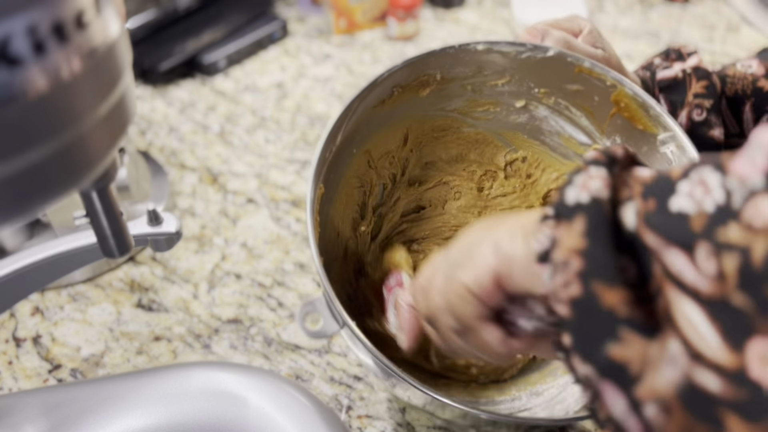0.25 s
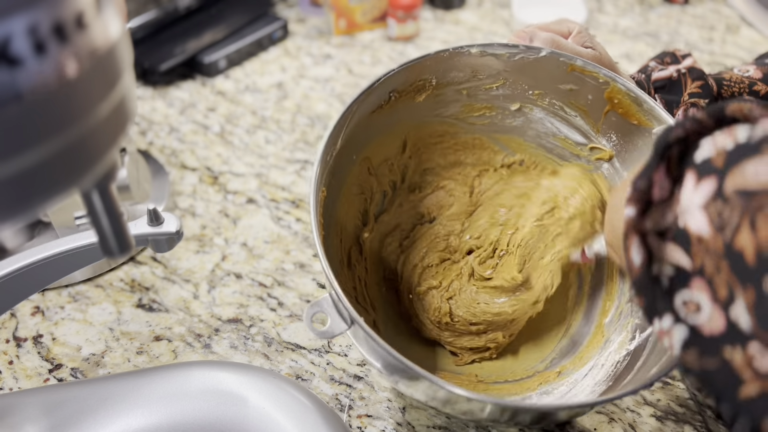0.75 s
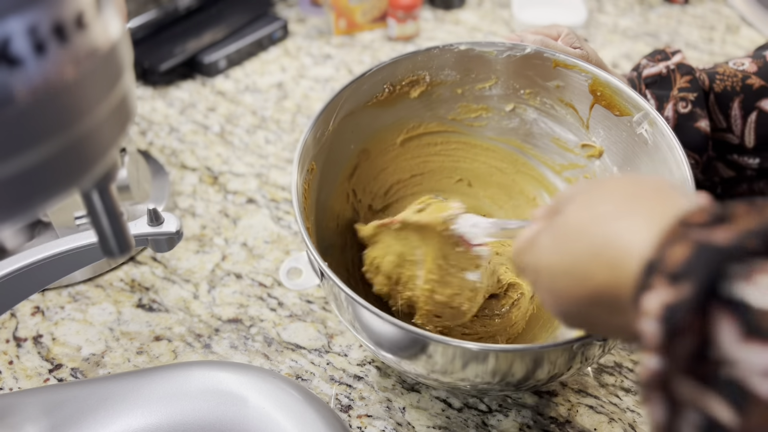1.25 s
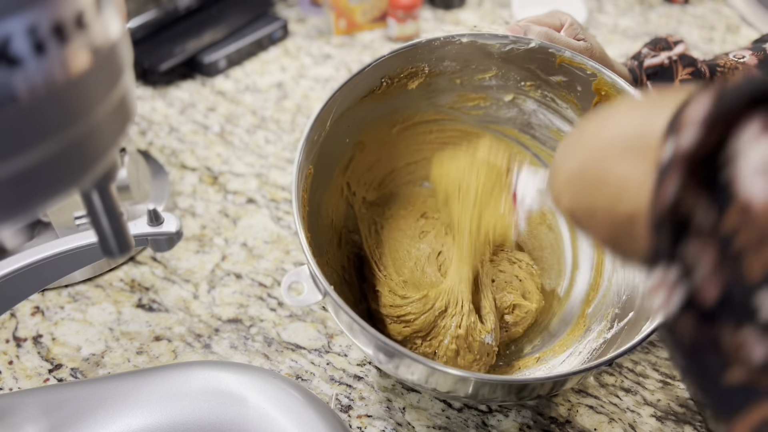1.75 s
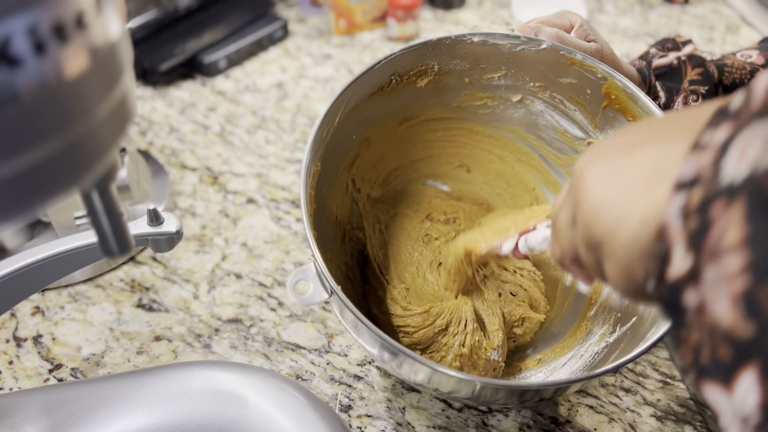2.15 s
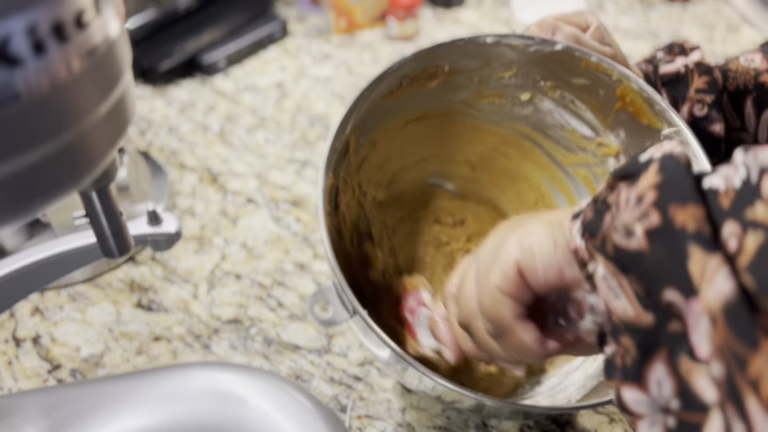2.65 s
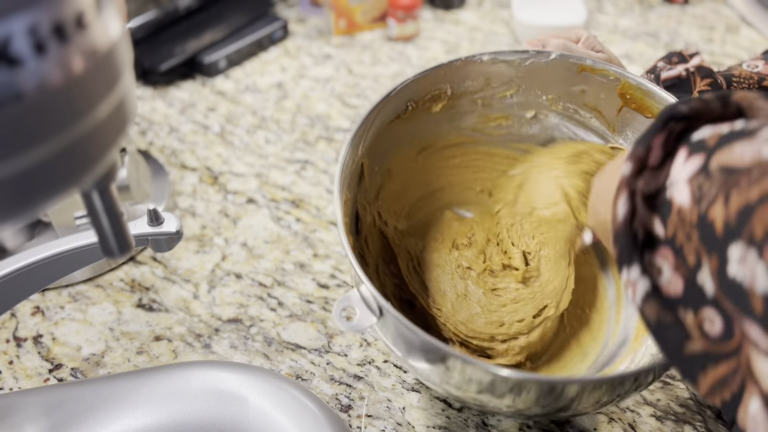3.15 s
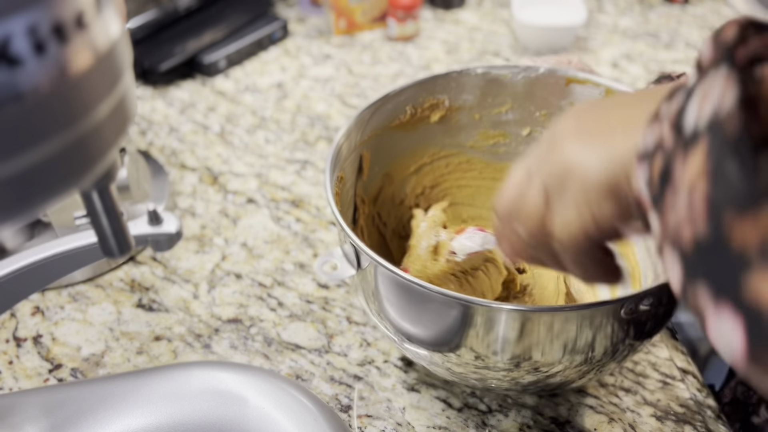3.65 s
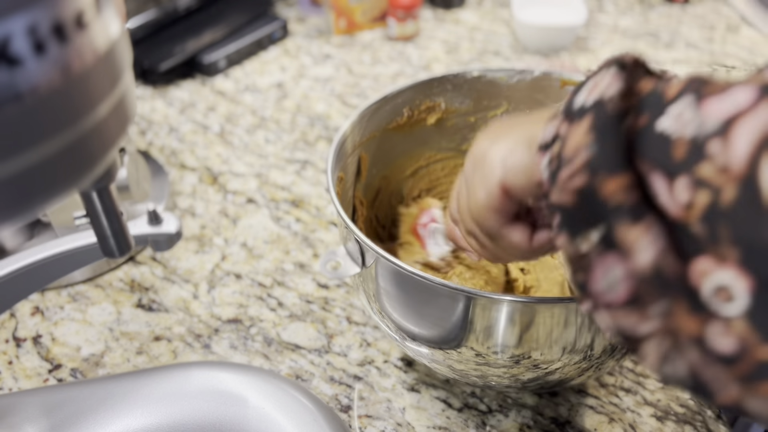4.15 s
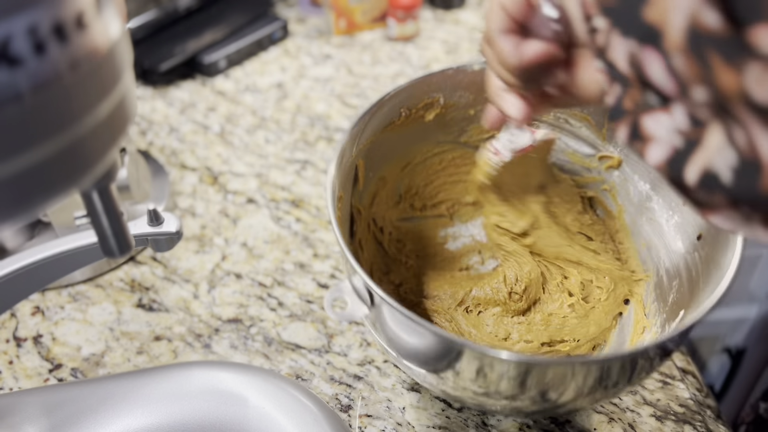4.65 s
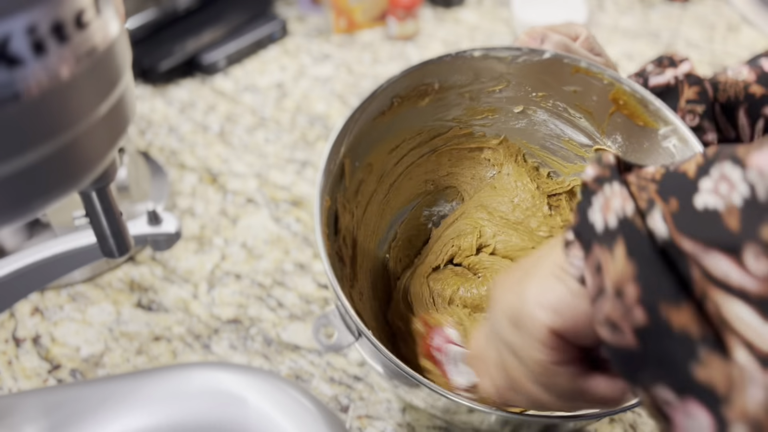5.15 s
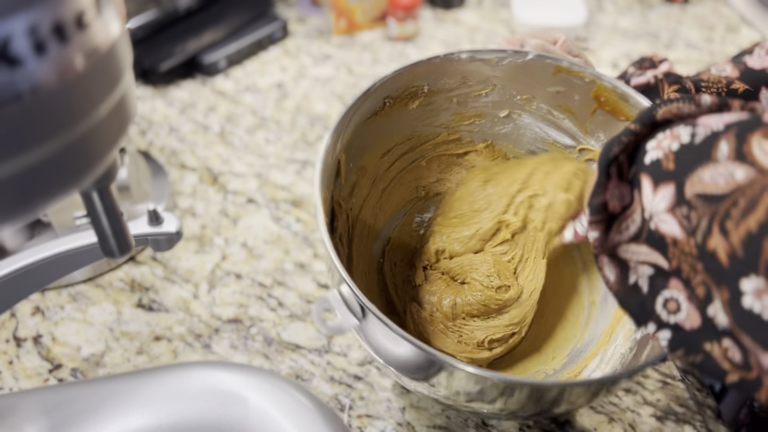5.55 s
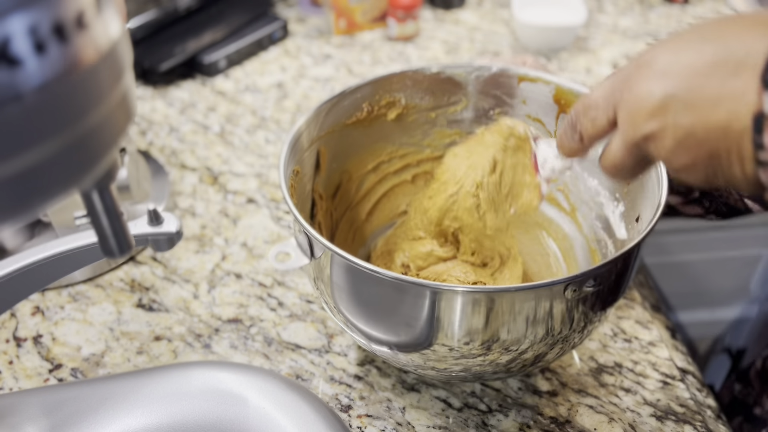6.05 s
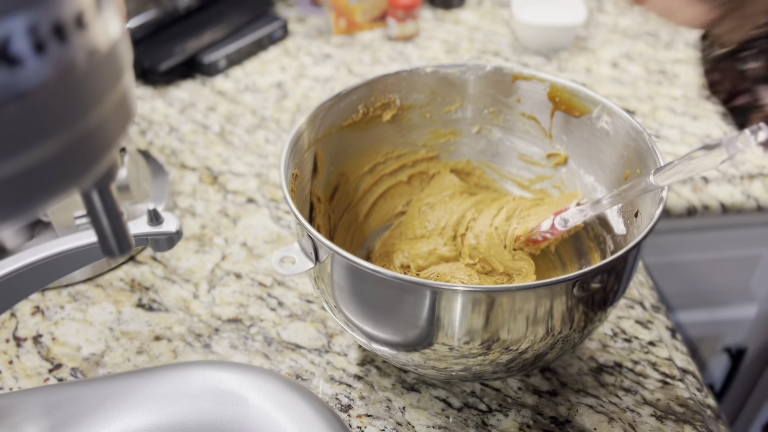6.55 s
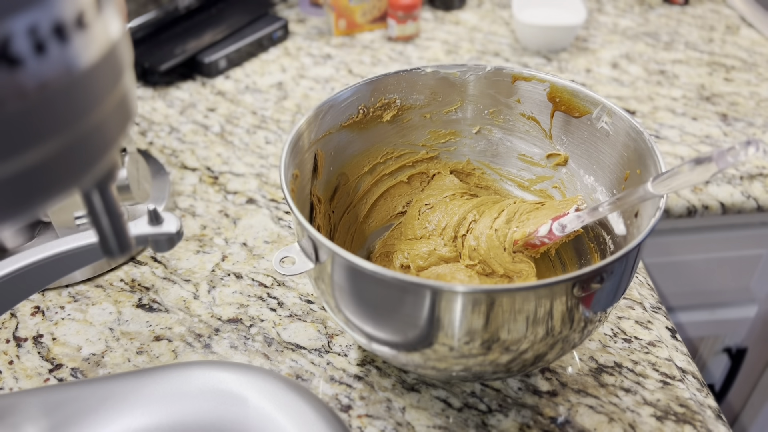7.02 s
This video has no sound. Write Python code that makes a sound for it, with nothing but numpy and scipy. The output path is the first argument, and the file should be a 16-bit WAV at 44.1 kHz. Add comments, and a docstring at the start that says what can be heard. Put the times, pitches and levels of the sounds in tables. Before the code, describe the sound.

A spatula rubs and smacks thick dough in a steel bowl, with dull thuds and a bright rim clink over a low kitchen hum.

```python
"""A spatula stirs thick dough in a steel bowl on a stone counter, close to a phone, over a rumbling, humming kitchen.
First the blade rubs the wall (filtered noise) in one long stroke, ending in a smack (a noise burst) at 1 s.
Short light strokes follow; near 3 s the blade judders, and at 3.3 s the handle clinks on the rim (fading tones).
After a quieter spell it rubs harder at 5.4 s; low thuds (fading tones) lead to the loudest clink at 6.2 s.
Near 6.8 s the phone is bumped, amid strong last strokes with the fizz of tearing dough (treble noise)."""
import sys
import numpy as np
from scipy import signal
from scipy.fft import rfft, irfft
from scipy.io import wavfile
from scipy.ndimage import uniform_filter1d

SR = 44100
rng = np.random.default_rng(int(sys.argv[2]) if len(sys.argv) > 2 else 0)


def file_out(sig):
    """Save sig as 16-bit WAV at sys.argv[1]."""
    # one column per channel
    cols = np.atleast_2d(sig).T
    # limit, then scale
    lim = np.clip(cols, -1, 1)
    pcm = np.round(lim * 32767).astype(np.int16)
    wavfile.write(sys.argv[1], SR, pcm)


N = 321048
T = np.arange(N) / SR

# tones of the steel bowl, held and damped by dough: (frequency [Hz], level [dB], time to fade by 60 dB [s])
BOWL_MODES = [(860, -20, 0.056), (994, -12, .06), (1063.7, 9.5, 0.08), (1080, -12, 0.037), (1170, -11, .07),
              (1296, -5, 0.092), (1482, -20, 0.066), (1606, -21, 0.2), (1720, -17, 0.21), (1970, -10, .11),
              (1966, -18, 0.14), (2120, -6, 0.051), (2085, -5, 0.061), (2215, -12.5, 0.08),
              (4585, -23.5, .06), (4800, -25.5, .05), (5070, -24, .045), (5800, -24.5, 0.07),
              (6680, -27, 0.066)]


def undb(db):
    """Turn decibels into a plain amplitude factor."""
    return 10 ** (np.asarray(db) / 20)


def unit(x):
    """Scale to an average (RMS) strength of 1."""
    return x / np.sqrt(np.mean(x ** 2))


def band(x, hz, width_hz):
    """Keep the sound around one pitch: a resonance of gain 1 at its centre, applied twice."""
    b, a = signal.iirpeak(min(hz, .45 * SR), hz / (1.36 * width_hz), fs=SR)
    once = signal.lfilter(b, a, x)
    return signal.lfilter(b, a, once)


def walk(rate):
    """Wander smoothly between random values, a new one every 1 / rate seconds; spread about 1.4."""
    k = int(SR / rate)
    steps = np.repeat(rng.standard_normal(N // k + 1), k)
    return 1.684 * uniform_filter1d(steps, k)[:N]


def fade(t60, s):
    """Die away as a struck body does, by 60 dB in t60 seconds; the curve is s seconds long."""
    return np.exp(-np.log(1000) * np.arange(int(s * SR)) / SR / max(t60, .003))


def ring(modes, contact_s):
    """Sound fading tones that build up over the contact, at random phases in each of the two paths."""
    t = T[:int(.4 * SR)]
    phase = 0.93 * rng.standard_normal((len(modes), 2, 1))
    out = 0
    for (hz, db, t60), p in zip(modes, phase):
        out = out + undb(db) * np.sin(2 * np.pi * hz * t + p) * fade(t60, .4)
    return out * (1 - np.exp(-t / max(contact_s, 1e-4)))


def add(out, x, s, db):
    """Mix in a sound that starts at s seconds, scaled so that its peak is at db."""
    i = int(s * SR)
    scaled = x * undb(db) / np.abs(x).max()
    out[:, i:i + x.shape[1]] += scaled[:, :N - i]


def kitchen():
    """Air noise with a swelling bass, noise through room resonances, and the wavering hum of a distant motor."""
    # colour of the kitchen air and the phone's own hiss: (frequency [Hz], relative level [dB per Hz])
    air_colour = [(22, -32.5), (59, 6), (80, -2), (114, -4.5), (190, -7), (235, -13), (416, -16),
                  (600, -18), (760, -22.5), (1400, -26.5), (2400, -53.5), (7000, -52), (9900, -95),
                  (12000, -44), (16000, -59.5)]
    # resonances of the room: (frequency [Hz], width [Hz], level [dB])
    room_modes = [(268.7, 19, -68), (318, 25, -71), (417, 27, -68), (586, 28, -69)]
    air_db = -51.5  # before the bass swells
    hum_hz, hum_db, waver_hz = 162.2, -58, 1.44  # the waver scales walk()

    hz, db = np.transpose(air_colour)
    f = np.fft.rfftfreq(N, 1 / SR) + 1
    colour = undb(np.interp(np.log(f), np.log(hz), db))
    colour = colour * np.minimum(f / hz[0], 1) ** 3  # falls away in the deepest bass
    air = unit(irfft(rfft(rng.standard_normal((2, N))) * colour, N)) * undb(air_db)
    bass_change = undb(1.2 * walk(4)) - 1
    air = air + bass_change * band(air, 70, 60)

    room = sum(undb(g) * unit(band(rng.standard_normal((2, N)), c, w)) for c, w, g in room_modes)

    hum = np.sin(2 * np.pi * np.cumsum(hum_hz + waver_hz * walk(6.5)) / SR)
    hum_level = np.sqrt(2) * undb(hum_db + .8 * walk(8))
    return air + room + hum * hum_level


def thuds():
    """Bowl foot and elbow hit the counter, and near 6.8 s the phone is bumped: dull tones, knock, rattle and boom."""
    # blows: (time [s], peak level [dB], pitch [Hz], knock against it [dB], boom against it [dB],
    # time for the dull tones to fade by 60 dB [s])
    blows = [(1.009, -41.5, 118, -10, -7, 0.091), (1.61, -29.5, 205, -6, -7.5, 0.052),
             (3.076, -41, 89, -11, -23, 0.13), (3.256, -26, 221, 1.5, -17.5, 0.032),
             (4.388, -30, 188, -7, -27, 0.26), (4.407, -33, 201.6, 0, -12, 0.18),
             (4.464, -38, 185, -2, -11.5, 0.13), (6.011, -30, 310, 6, -21, 0.1),
             (6.025, -20, 194.5, -8.5, -17, 0.058), (6.041, -35.5, 152, 0, -7, 0.14),
             (6.206, -26.5, 208, -0.5, -10, 0.086), (6.533, -43.5, 164, 4.5, -6, 0.098),
             (6.813, -21.5, 155.5, -25, -18, 0.07), (6.829, -27.5, 171, -15, -21, 0.056),
             (6.871, -29.5, 130, -20, -9.5, 0.047)]
    # tones of the knock, from the bowl's foot: (frequency [Hz], level [dB], time to fade by 60 dB [s])
    knock_modes = [(524, 4.5, 0.02), (591, 0, 0.024), (1038, -13.5, 0.047)]
    boom_hz, boom_t60_s = 63.8, 0.12  # the cabinet under the counter

    out = np.zeros((2, N))
    for s, db, hz, knock_db, boom_db, t60 in blows:
        dull = [(hz, 0, t60), (0.583 * hz, -8, t60), (1.47 * hz, -14, t60)]
        add(out, ring(dull, 0.0033), s, db)
        add(out, ring(knock_modes, 0.0027), s, db + knock_db)
        rattle = rng.standard_normal((2, int(.2 * SR))) * fade(0.12, .2)
        add(out, band(rattle, 593, 590), s, db + knock_db - 11)
        add(out, ring([(boom_hz, 0, boom_t60_s)], 0.024), s + 0.015, db + boom_db)
    return out


def clinks():
    """The handle hits the rim: a harder blow feeds the higher bowl tones, and the handle adds a short clack."""
    # blows: (time [s], peak level [dB], hardness [dB per octave], contact [s],
    # dead clack against the ring [dB], shimmer against the ring [dB], shimmer centre [Hz])
    blows = [(3.255, -21.5, -10, 0.00034, 9, -4, 7500), (6.205, -10.5, 8, 0.0034, -3.5, -2, 4910),
             (6.218, -17.5, -9, 0.0099, -26, -14, 4440), (6.533, -56, 1, 0.0013, 11, -2, 5300)]
    # tones of the plastic handle: (frequency [Hz], level [dB], time to fade by 60 dB [s])
    handle_modes = [(1116.3, 3.5, 0.015), (1453, -5.5, 0.018), (2190, -8, 0.011), (2540, -15, 0.012),
                    (4700, -16, 0.014)]
    # the crowd of high bowl tones, too dense to tell apart, is made as noise
    shimmer_width_hz, shimmer_t60_s = 2730, 0.075
    # the handle comes to rest on the rim and damps the ring
    settle_s, settle_t60_s = .045, .12

    out = np.zeros((2, N))
    damping = np.append(np.ones(int(settle_s * SR)), fade(settle_t60_s, .4))[:int(.4 * SR)]
    for s, db, tilt_db, contact, clack_db, shimmer_db, shimmer_hz in blows:
        modes = [(hz, g + tilt_db * np.log2(hz / 1061), t60) for hz, g, t60 in BOWL_MODES]
        add(out, ring(modes, contact) * damping, s, db)
        add(out, ring(handle_modes, 0.00057), s, db + clack_db)
        crowd = rng.standard_normal((2, int(.4 * SR))) * fade(shimmer_t60_s, .4)
        add(out, band(crowd, shimmer_hz, shimmer_width_hz), s, db + shimmer_db)
    return out


def judders(out):
    """The blade sticks and slips: a train of tiny noise bursts, a little uneven in time and strength."""
    # stretches: (start [s], end [s], slips per second [Hz], centre [Hz], typical peak level [dB],
    # treble against it [dB])
    stretches = [(2.74, 2.77, 84, 3400, -42.5, -13), (3.035, 3.091, 106, 3160, -44.5, 1),
                 (4.11, 4.285, 100, 4800, -54.5, -13)]
    for start, end, rate, hz, db, top_db in stretches:
        for s in np.arange(start, end, 1 / rate):
            slip = rng.standard_normal((2, 900)) * fade(0.011, 900.5 / SR)
            late, size = rng.standard_normal(2)
            add(out, band(slip, hz, 0.37 * hz), s + 0.0013 * late, db + 3.3 * size)
            add(out, band(slip, 12440, 1800), s + .001 * late, db + top_db + 2.5 * size)


def ticks(rasp_db):
    """Dough smacks: short noise bursts through two resonances and a quicker top; then the judders."""
    # smacks and ticks: (time [s], peak level of the low part [dB], low centre [Hz], high centre [Hz],
    # high part against low [dB], top against low [dB])
    smacks = [(0.319, -55.5, 2780, 4900, 10, -10), (1.0091, -33, 3960, 8260, 8.5, 1.5),
              (1.6, -45, 2420, 4750, 1, -4), (2.3553, -42, 3200, 5050, 9.5, 8.5),
              (2.587, -48, 2260, 6500, 3.5, -15), (2.799, -43, 3580, 4700, -16, 1.5),
              (2.83, -45.5, 3580, 5670, -3, 2), (2.854, -45.5, 3570, 6990, 0, 6),
              (2.88, -51, 2170, 5080, -8, 4), (3.2555, -27.5, 2500, 4770, 4.5, 3),
              (3.3706, -57.5, 2020, 5150, 14.5, 11.5), (3.4224, -60.5, 2060, 5300, 14.5, 11),
              (4.102, -62.5, 4280, 5100, 0, 7), (4.2966, -49, 2200, 4900, -4, -4),
              (4.3892, -54.5, 2800, 5660, 4, -16), (4.5136, -60, 2980, 7230, 2, 7),
              (5.5496, -37.5, 4600, 6170, -1, -7), (5.6755, -47.5, 3000, 5000, 2.5, -10),
              (5.7507, -46, 3500, 5600, -26, -21), (5.8688, -49, 3240, 6320, 3, -3),
              (6.0096, -43.5, 2220, 5300, 6, -7), (6.0891, -46, 2320, 4800, -9, -15),
              (6.2055, -20.5, 2070, 6460, -9, -12), (6.5311, -51, 4370, 4430, -7, -12),
              (6.569, -54, 4390, 4960, 2, -14), (6.853, -41, 2600, 5270, 15, 13),
              (6.9452, -47.5, 2740, 6160, 13.5, 2), (7.0864, -47, 4350, 5200, 6.5, -16),
              (7.1183, -43, 4470, 4640, 3, -18)]
    tick_t60_s = 0.031
    # faint smacks by chance: level against the rasp, scatter either way, typical centre
    crackle_db, crackle_spread_db, crackle_hz = 8.5, 4.5, 3100

    faint = []
    for where, size, tone in rng.random((40, 3)):
        i = int(where * N)
        db = rasp_db[i] + crackle_db + crackle_spread_db * (2 * size - 1)
        faint.append((i / SR, db, crackle_hz * (0.75 + 0.71 * tone), 5100, -4, -3))

    out = np.zeros((2, N))
    for s, db, low_hz, high_hz, high_db, top_db in smacks + faint:
        noise = rng.standard_normal((3, 2, int(.2 * SR)))
        noise[:, :, 0] = 3.2  # each starts with a clean snap
        low, high = noise[:2] * fade(tick_t60_s, .2)
        top = noise[2] * fade(0.66 * tick_t60_s, .2)
        add(out, band(low, low_hz, 0.24 * low_hz), s, db)
        add(out, band(high, high_hz, 0.3 * high_hz), s, db + high_db)
        add(out, band(top, 12340, 2000), s, db + top_db)
    judders(out)
    return out


def swishes():
    """The rubbing sings in one band: narrow noise that comes a little quicker than it ebbs."""
    # stretches: (start [s], length [s], centre [Hz], peak level [dB])
    stretches = [(0.69, 0.15, 4200, -39.5), (0.9, .08, 7000, -49), (2.55, 0.25, 6850, -54),
                 (3.09, .12, 6900, -49.5), (2.97, 0.18, 5100, -49.5), (2.933, 0.083, 1930, -47),
                 (4.775, .05, 2350, -57), (5.093, 0.15, 7100, -49), (5.305, 0.068, 4700, -45),
                 (5.24, 0.063, 7300, -45), (5.722, 0.054, 3400, -50), (6.734, 0.16, 2800, -39.5),
                 (6.722, 0.23, 5560, -39.5), (7.115, 0.039, 4750, -35)]
    out = np.zeros((2, N))
    for s, length, hz, db in stretches:
        n = int(length * SR)
        swell = np.abs(np.sin(np.pi * np.linspace(0, 1, n) ** 0.77)) ** .5
        add(out, band(rng.standard_normal((2, n)) * swell, hz, 0.19 * hz), s, db)
    return out


def pressure():
    """Pressing harder rubs louder: levels of drone, middle, rasp and fizz swell and ebb by one rule."""
    # swells of rubbing, and at 6.07 s the dying tail of the hits: (time of the top [s], rise [s], fall [s],
    # level there of rasp [dB], wall drone [dB], middle [dB], fizz of tearing dough [dB])
    swells = [(0.14, 0.13, 0.2, -88, -66, -75.5, -84), (0.33, .25, 0.23, -67.5, -66.5, -74, -77),
              (0.752, 0.35, 0.19, -53, -55.5, -58, -68), (0.95, 0.11, 0.21, -64.5, -62, -73, -72),
              (1.65, 0.066, 0.039, -68.5, -69, -82, -76), (1.76, 0.073, 0.022, -75, -82, -80, -76),
              (2.02, 0.028, 0.044, -72, -72, -71.5, -79), (2.12, 0.023, 0.1, -79, -81, -84, -76.5),
              (2.19, 0.049, 0.054, -73.5, -72, -83, -83), (2.6, 0.15, 0.37, -68.5, -64.5, -74, -81),
              (2.8, 0.3, 0.37, -66, -65, -67, -74), (3.07, 0.17, 0.17, -61.5, -56, -59, -65.5),
              (3.2, .1, 0.29, -65, -64.5, -72, -71.5), (3.49, 0.045, 0.047, -61, -60.5, -90, -82),
              (3.56, 0.046, 0.14, -69, -66.5, -85, -84), (3.69, 0.078, 0.054, -78, -72, -82, -80),
              (3.85, 0.13, 0.11, -80.5, -67, -87, -85), (4.21, 0.12, 0.42, -69.5, -69, -70, -78.5),
              (4.41, 0.14, 0.18, -74, -66.5, -75.5, -85), (4.8, 0.28, 0.75, -73.5, -72, -75, -80.5),
              (5.16, 0.13, 0.099, -58.5, -68, -73, -79), (5.45, 0.35, 0.23, -53.5, -58.5, -63.5, -66),
              (5.72, 0.039, 0.14, -86, -74, -62.5, -81), (6.07, 0.26, 0.23, -70, -57.5, -68.5, -88),
              (6.62, 0.045, 0.12, -85, -57, -84, -99), (6.8, 0.092, 0.18, -59, -51, -49.5, -60.5),
              (6.93, 0.25, 0.13, -57, -58, -60, -74), (7.125, 0.064, 0.12, -60.5, -59.5, -60.5, -78),
              (7.27, 0.13, 0.082, -59.5, -65, -59, -75)]
    # dough creeps on between swells: rasp [dB], drone [dB], middle [dB], fizz [dB]
    rest_db = [-91.5, -82.5, -86.5, -94]
    edge_db = 16  # drop at one rise or fall time from the top
    rise_shape, fall_shape = 1.4, 1.27  # 1 = pointed, 2 = round

    power = undb(2 * np.array(rest_db))[:, None] + 0 * T
    for s, rise, fall, *db in swells:
        before = np.abs((s - T) / max(rise, .01)) ** rise_shape
        after = np.abs((T - s) / max(fall, .01)) ** fall_shape
        away = np.where(T < s, before, after)
        power = power + undb(2 * np.array(db))[:, None] * undb(-2 * edge_db * away)
    return 10 * np.log10(power[[1, 2, 0, 3]])  # from low to high: drone, middle, rasp, fizz


def rubbing(at):
    """Dense grit under the blade excites wall bands and bowl tones, which swell in patches."""
    # bands that rubbing excites: (centre [Hz], width [Hz], level against the swell [dB])
    wall_bands = [(925, 320, -4.5), (1340, 510, -9.5), (2150, 1500, -3), (3130, 1260, -3.5),
                  (3820, 1500, -6), (4720, 1150, -2.5), (5770, 1170, -2.5), (6920, 990, -1.5),
                  (8500, 3200, -4), (10640, 1700, -5.5), (11500, 1200, 0.5), (13000, 2400, 3.5),
                  (14230, 1800, -12.5)]
    # where drone, middle, rasp and fizz sit: centre [Hz] of each
    control_hz = [1400, 3000, 6000, 11000]
    # rubbing also sounds some of the bowl's tones
    wall_ring_db, wall_ring_hz = -11, 130  # level against the swell, width

    grains = np.repeat(np.minimum(rng.exponential(size=N // 40 + 1), 3), 40)[:N]
    grit = undb(2.1 * grains)
    modes = [(hz, wall_ring_hz, wall_ring_db) for hz, _, _ in BOWL_MODES[2::4]]
    out = 0
    for hz, width, db in wall_bands + modes:
        # each band blends the two controls nearest in pitch
        place = np.interp(np.log(hz), np.log(control_hz), range(4))
        share = np.clip(1 - np.abs(place - np.arange(4)), 0, 1)
        patch = 2.0 * walk(14) + 1.5 * walk(45)
        noise = unit(band(grit * rng.standard_normal((2, N)), hz, width))
        out = out + undb(share @ at + db + patch) * noise
    return out


def echoes(sound):
    """Counter and walls answer as a fading tail of noise; the farther kitchen answers longer."""
    echo_db, echo_t60_s = -5.5, 0.17  # level before the soft onset below
    late_db, late_t60_s = -16, 0.57  # level against the first echoes
    decay = fade(echo_t60_s, .4) + undb(late_db) * fade(late_t60_s, .4)
    tail = unit(rng.standard_normal((2, int(.4 * SR))) * decay) / np.sqrt(.4 * SR)
    tail = tail * (1 - fade(.025, .4))  # the first reflections need a few ms to arrive
    return undb(echo_db) * signal.fftconvolve(sound, tail, axes=1)[:, :N]


def scene():
    """Sum every source over two paths to the phone, with echoes of the smacks, thuds and clinks."""
    at = pressure()
    snaps, bumps = ticks(at[2]), thuds()
    rim = clinks()
    # the smacks sit down inside the bowl, so they echo less
    reflected = echoes(0.7 * snaps + bumps + 0.96 * rim)
    return snaps + bumps + rim + reflected + rubbing(at) + swishes() + kitchen()


def record(dry):
    """The left port takes the first path; the right mixes it, turned in phase, with the second; the top is cut."""
    # how the right port hears it: (frequency [Hz], likeness to the left [0-1], phase lead [rad], level [dB])
    ports = [(59.3, .97, 0, -0.5), (125, 0.98, 0.5, -4.5), (203.6, 0.77, 1, -6.5), (376, 0.45, 0, 0.5),
             (926, 0.38, 2, -2.5), (1700, 0.6, 1.3, -4), (2440, 0.62, 1.56, -1), (4550, 0, 0.2, -6.5),
             (5400, 1, -0.5, -12), (6920, 0.04, 9, -5.5), (8300, 0.67, 7, -1.5), (9600, .995, 9.2, 0),
             (10700, .995, 9.65, 0), (11500, .95, 10.7, 0), (12800, 0.9, 12, -1.5), (16300, 0.74, 15, 4.5)]
    top_hz = 16300
    hz, like, lead, db = np.transpose(ports)
    f = np.log(np.fft.rfftfreq(N, 1 / SR) + 1)
    like, lead, db = (np.interp(f, np.log(hz), c) for c in (np.clip(like, 0, 1), lead, db))
    first, second = rfft(dry)
    shared = like * np.exp(1j * lead) * first
    own = np.sqrt(1 - like ** 2) * second
    right = irfft(undb(db) * (shared + own), N)
    low_pass = signal.ellip(10, .3, 80, top_hz, fs=SR, output="sos")
    return signal.sosfilt(low_pass, [dry[0], right])


dry = scene()
out = record(dry)
file_out(out)
```